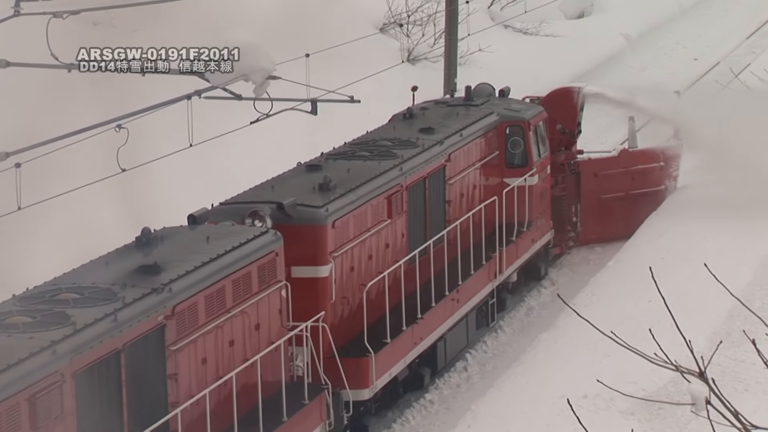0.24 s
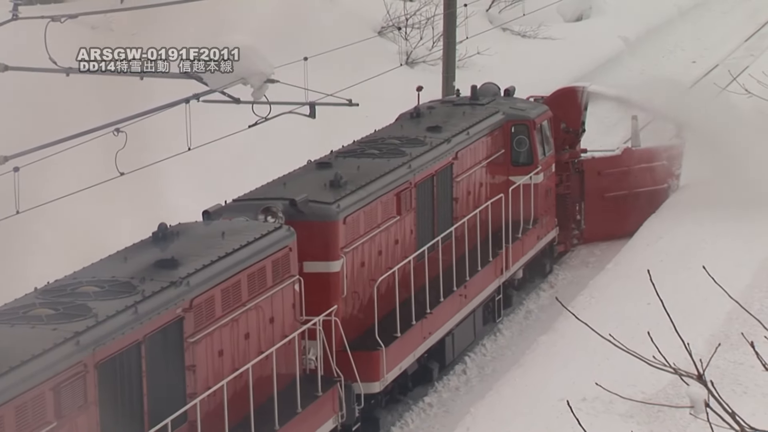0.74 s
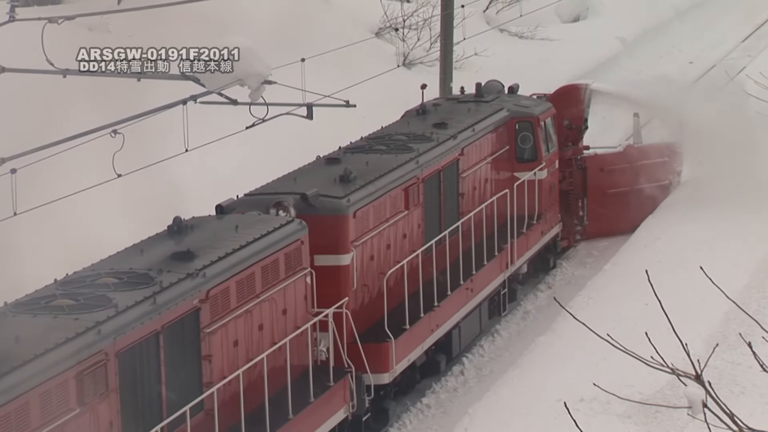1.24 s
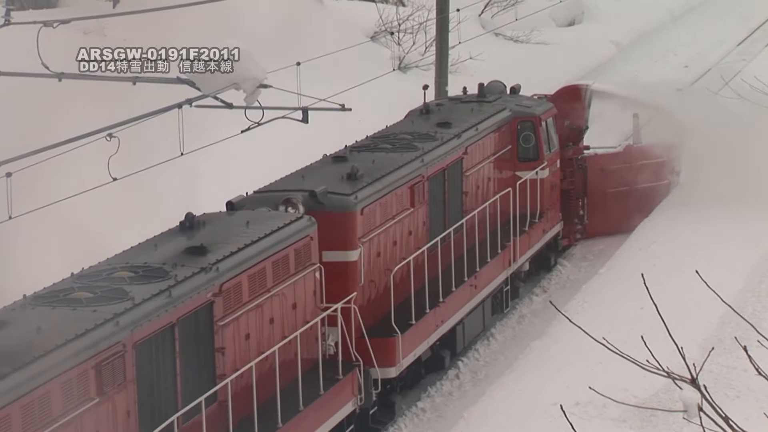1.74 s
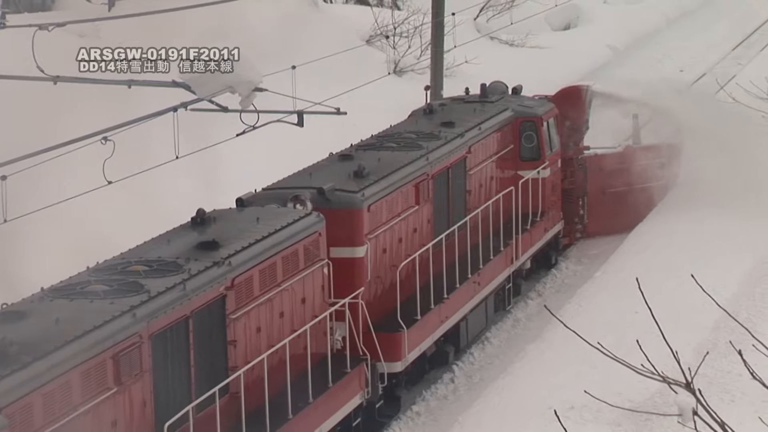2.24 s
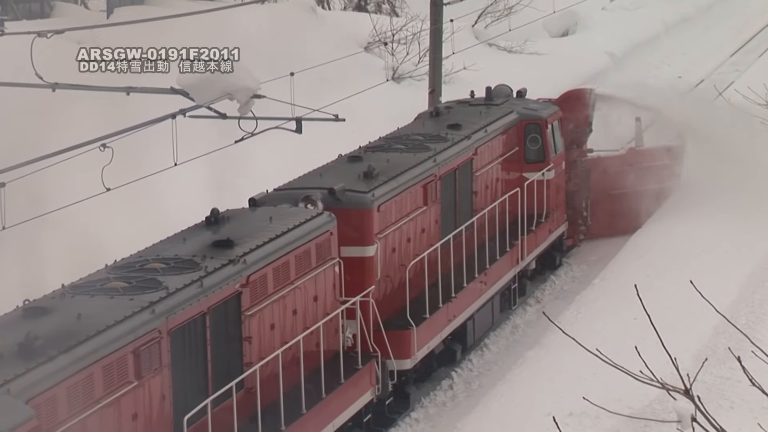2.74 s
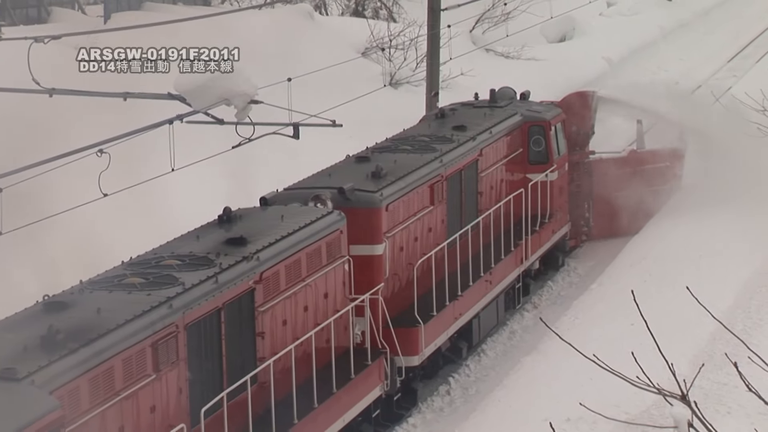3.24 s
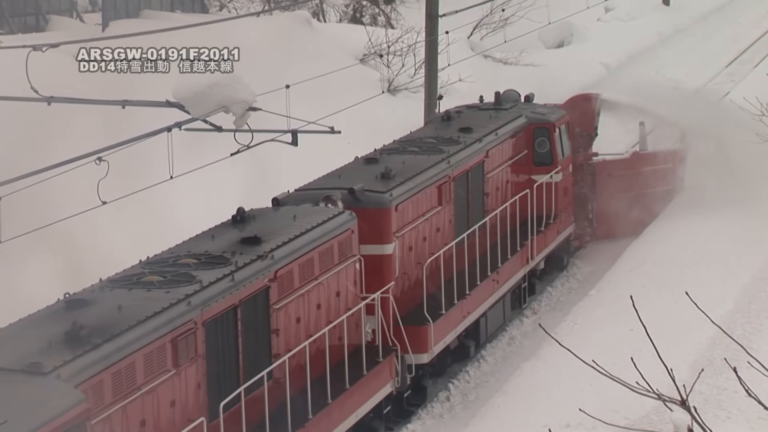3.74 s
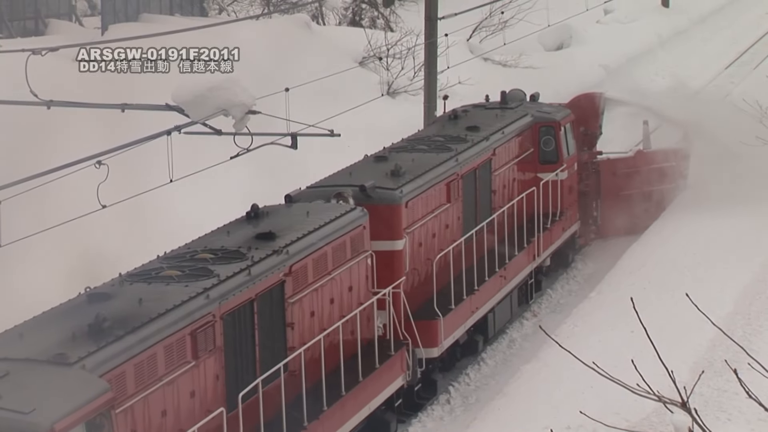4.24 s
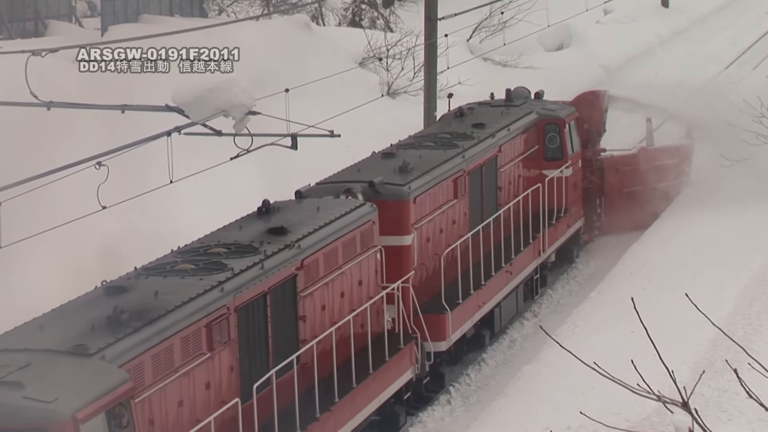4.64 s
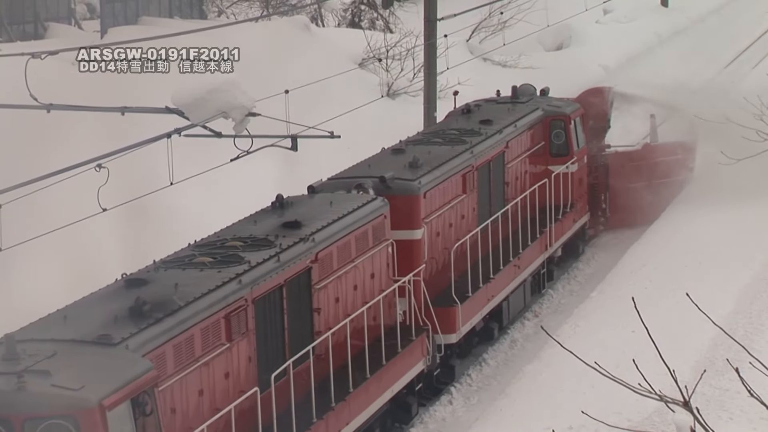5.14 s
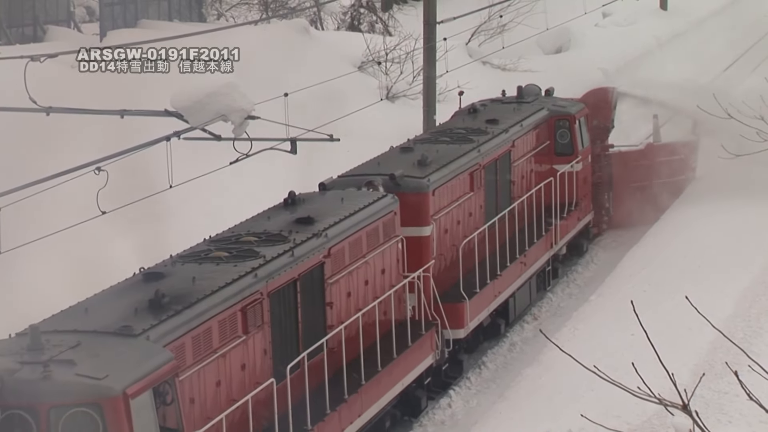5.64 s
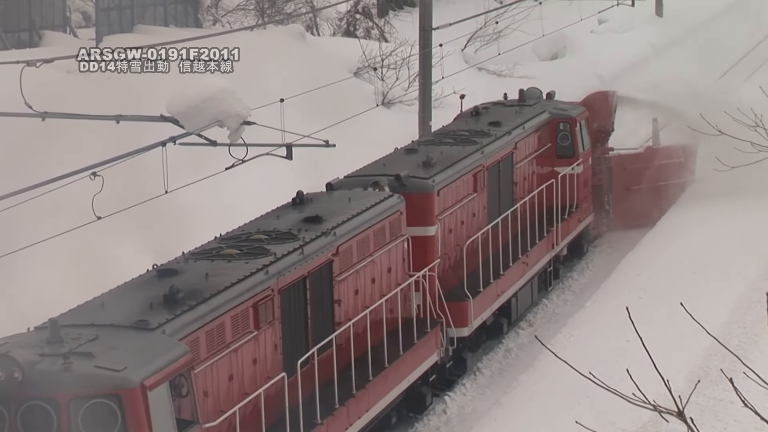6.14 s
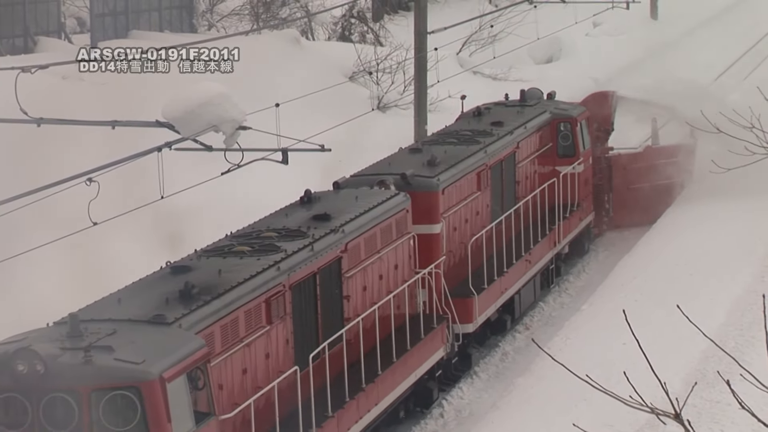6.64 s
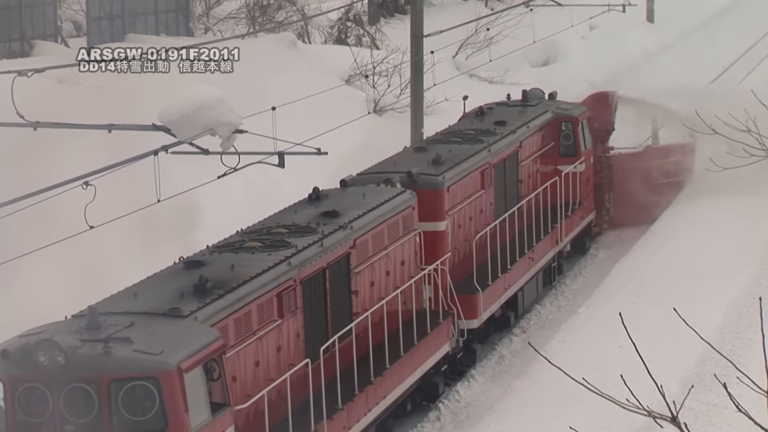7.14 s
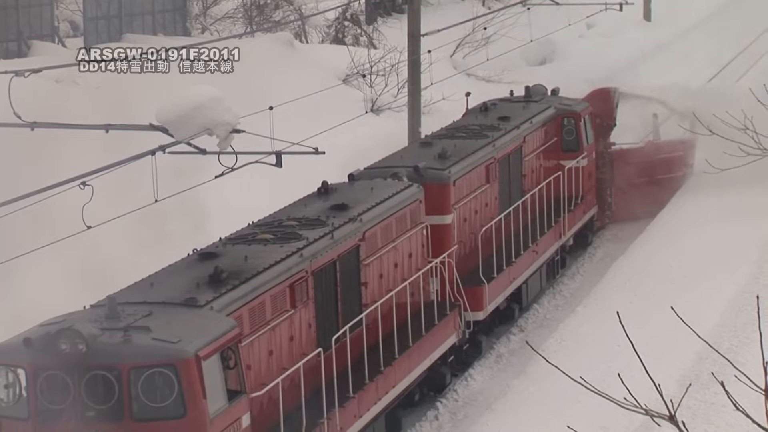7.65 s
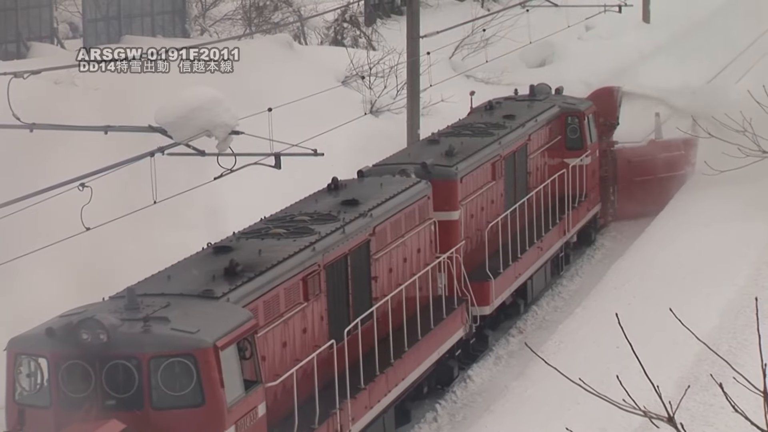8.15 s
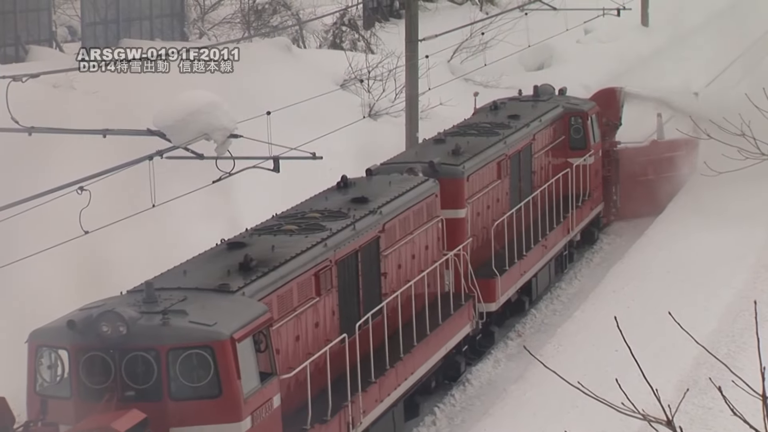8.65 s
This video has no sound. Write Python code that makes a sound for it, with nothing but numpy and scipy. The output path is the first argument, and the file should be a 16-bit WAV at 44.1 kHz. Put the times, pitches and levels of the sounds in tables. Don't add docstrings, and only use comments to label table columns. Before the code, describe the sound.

Diesel locomotives throb and a snow blower thumps and roars with whining gears on a snowy railway, while nearby camera shutters snap.

```python
import sys
import numpy as np
from scipy import signal
from scipy.fft import rfft, irfft
from scipy.io import wavfile
from scipy.ndimage import uniform_filter1d

SR = 44100
rng = np.random.default_rng(int(sys.argv[2]) if len(sys.argv) > 2 else 0)


def makeup_ratio(level_db):
    decades = np.asarray(level_db, float) / 20
    return 10 ** decades


def output_pcm(signal):
    pcm = np.clip(np.atleast_2d(signal).T, -1, 1) * 32767
    wavfile.write(sys.argv[1], SR, np.round(pcm).astype(np.int16))


N = 392049

# frequency_hz, left_right_likeness [0 to 1]
LIKENESS = [(30, .8), (110, .97), (200, .995), (380, 0.9), (700, 0.92), (1290, 0.86), (2380, 0.98),
            (4400, 0.97), (8120, 0.036), (15000, 0.25)]
# frequency_hz, left_right_db
BALANCE = [(60, 0), (200, 0), (330, -.8), (640, .3), (1410, -1.2), (3100, .1), (6820, 0)]
# time_s, engine_effort_db, snow_feed_db
WORK = [(0, -37.5, -33.5), (.3, -37, -32), (.89, -36.5, -35), (1.11, -36, -35), (1.36, -38.5, -37),
        (1.71, -40, -36.5), (2.13, -39.5, -34), (2.75, -37, -33.5), (3.17, -37.5, -35.5), (3.46, -38, -34),
        (3.84, -37.5, -35.5), (4.8, -40.5, -36.5), (5.2, -39.5, -37), (5.95, -41, -35.5), (6.9, -39.5, -37),
        (7.67, -42, -39), (8.39, -39.5, -37), (8.89, -39.5, -36.5)]
# centre_s, half_length_s, level_db
GUSTS = [
    (.95, 0.23, 1),
    (3.8, 0.27, 2),
    (6.15, 0.2, 0.5),
    (6.65, 0.27, 2),
    (8.6, .3, -1.5),
]
# frequency_hz, density_db [per Hz]
SNOW_HISS = [(4300, -20), (5000, 2), (5700, -0.5), (7100, -10.5), (8200, -7.5), (9600, -11.5), (11200, -7),
             (13000, -10.5), (14200, -8), (14400, -40), (15000, -70)]
# time_s, shaft_hz
FANS = [
    [(0, 30.1), (3.5, 30.12), (5.5, 30.38), (8.89, 30.36)],
    [(0, 33.03), (2, 33.1), (5, 33.28), (8.89, 33.28)],
]
# shaft_order, level_db
FAN_ORDERS = [(1, -46), (2, -50)]
# start_s, level_db, left_right_db, dull_knock_db [knock under the tick]
TICKS = [(1.36, -39, 9, -5), (1.6565, -36.5, -5, 0), (1.765, -37, 9, -10), (1.8025, -36, 11, -12),
         (1.882, -28, 12, -5), (2.4738, -34, 13, -12), (2.6555, -41, -10, -12), (3.1937, -25, 12, -10),
         (3.8574, -42, 6, -12), (4.1455, -34, -16, -12), (4.1567, -32, 12, -11), (4.292, -32.5, 15, -2),
         (4.301, -38, -7, 3), (4.566, -29, 10, 1), (4.9195, -38, -8, 0), (5.74, -34, 7, 1),
         (5.7465, -37, 7, -2), (5.8425, -40, 9, -3), (5.8523, -33, 13, -2), (6.091, -33, 10, -16),
         (6.824, -26, -13, -1), (6.9455, -43, 5, -4), (7.058, -42, 1, 2), (7.2245, -37, 3, -4),
         (7.4015, -40, 9, -14), (7.587, -38, -9, -8), (7.9247, -23, -8, -16), (8, -29.5, 6, -10),
         (8.8067, -30.5, 11, 7), (8.8825, -41, -6, -2)]
# frequency_hz, level_db
TICK_COLOUR = [(5000, -30), (7000, -24), (9000, -5.5), (11500, 1.5), (14000, 3.5), (15300, -2),
               (16500, -28)]
# frequency_hz, level_db
KNOCK_COLOUR = [(2000, -22), (3500, 1), (5000, 4), (6500, -11.5), (8500, -11)]
# start_s, level_db, mirror_up_s
RELEASES = [(0.0272, -33, .0649), (0.357, -35, .0643), (0.5535, -32, .0675), (2.0806, -32.5, .0673),
            (2.2781, -34.5, .0699), (2.7215, -34.5, .0645), (2.9182, -33.5, .0673), (5.239, -32, .064),
            (5.436, -33, .0668), (8.1705, -33, .0628), (8.3678, -32.5, .0635)]
# delay_s [after release], level_db, rise_s, t60_s
MIRROR_LIFT = [
    (0, 2, 0.0011, 0.031),
    (.003, -20, 0.00088, 0.009),
    (.009, -26, .001, .015),
    (.025, -5.5, 0.0011, 0.023),
]
# delay_s [after return], level_db, rise_s, t60_s
MIRROR_RETURN = [
    (-.025, -4, .003, .08),
    (-.018, -4, 0.0012, .025),
    (-.01, -20, .005, .06),
    (0, 0.5, 0.0013, 0.025),
    (.004, -7, 0.00086, 0.025),
    (.014, -14, .004, 0.07),
    (0.024, -9, 0.0012, 0.041),
    (.032, -12, .003, .02),
]
# start_s, level_db
SHOTS = [
    (1.5137, -33.5),
    (2.5124, -34),
    (3.551, -34.5),
    (4.757, -34),
]
# delay_s [after release], level_db, rise_s, t60_s
SHOT_CYCLE = [
    (0, -2.5, 0.0013, 0.032),
    (0.01, -14, .002, .02),
    (0.015, 2.5, 0.00056, 0.016),
    (.023, -6, .001, .012),
    (.05, -14, .003, .02),
    (0.055, 0, 0.0014, 0.031),
    (.071, -9, .001, .01),
    (.082, 5.5, 0.0019, .03),
    (.141, -8.5, .001, .012),
]
# frequency_hz, density_db [per Hz]
LEFT_BODY = [(1800, -18), (3000, 1.5), (4200, -6), (5100, -1.5), (5550, -1.5), (6100, -6), (7000, -12.5),
             (8200, -6.5), (9600, -10), (11400, -3.5), (12600, -8.5), (13900, -5), (15100, -15),
             (16000, -50)]
# frequency_hz, density_db [per Hz]
RIGHT_BODY = [(1800, -30), (3200, -8), (4800, 1), (6000, -7.5), (6800, -12), (8200, -6.5), (9700, -11),
              (10600, -2), (12000, -8), (13400, 2), (15000, -0.5), (16200, -40)]
# frequency_hz, width_hz, level_db
BANKS = [(1000, 26, 2), (1444, 25, -7), (1790, 68, -1.5), (4530, 200, -9.5), (5340, 71, -13)]
# frequency_hz, density_db [per Hz]
EXHAUST = [(15, -45), (24, -24), (36, -28), (50, -18), (70, -13), (100, -8), (135, -1.5), (200, -6),
           (260, -9.5), (320, -15), (450, -12.5), (600, -11), (900, -13.5), (1100, -33)]
# frequency_hz, density_db [per Hz]
DRONE = [(550, -4), (940, -12.5), (993, -9.5), (1100, 4), (1220, 1.5), (1270, 2.5), (1420, -17.5),
         (1460, -12.5), (1900, -49), (3210, -120)]
# frequency_hz, density_db [per Hz]
WHINE = [(840, -46), (1420, -5.5), (1590, 5), (1670, 4), (1780, 4), (1880, -17.5), (2440, 3), (4140, -120)]
# frequency_hz, density_db [per Hz]
MESH = [(1570, -25), (1610, -2), (1645, 2), (1690, -38)]
# frequency_hz, density_db [per Hz]
HOWL = [(1060, -26), (1800, -9), (1880, -6.5), (2420, 3), (3000, -9.5), (3400, -17.5), (4420, -49),
        (7480, -120)]
# frequency_hz, density_db [per Hz]
RUSH = [(1820, -29), (3100, -2), (3790, -4), (4410, -14.5), (4670, -4.5), (4920, -8.5), (5390, -19),
        (5810, -19.5), (6190, -29), (7200, -36.5), (9360, -61), (15800, -120)]
# centre_s, half_length_s, level_db
SURGES = [
    (0.286, 0.61, 6),
    (1.05, 0.17, 2),
    (1.9, 0.34, 1.5),
    (2.552, 0.97, 5),
    (3.605, 0.31, 3.5),
    (4.254, 0.37, 5.5),
    (5.29, 0.12, 4.5),
    (6.291, .8, 2),
    (7.67, 0.28, -1),
    (8.5, .4, 3),
]
# cycle_order, level_db
LEAD = [(3, -69), (4, -57), (6, -32.5), (7, -48), (8, -48), (9, -47), (10, -46.5), (11, -54.5), (12, -48),
        (14, -69), (15, -83), (18, -60.5), (20, -67.5), (24, -71), (26, -78), (28, -61.5), (32, -72.5),
        (36, -54), (38, -60), (41, -50)]
# cycle_order, level_db
REAR = [(3, -49.5), (5, -80), (6, -35.5), (7, -44), (8, -55), (9, -37), (10, -43.5), (11, -50.5), (12, -70),
        (14, -48.5), (15, -47), (17, -55.5), (18, -56.5), (28, -55.5), (32, -53), (33, -58.5), (36, -60),
        (37, -68), (42, -52), (48, -55), (60, -56)]
# frequency_hz, level_db, t60_s
CHUTE = [(139.4, -6.5, 0.31), (112.9, 2, 0.27), (203, 1.5, 0.042)]
# blade_order, level_db
BLADE_HUM = [(6, -43.5)]
# start_s, level_db
LUMPS = [(0.1, -16), (0.15, -12.5), (0.796, -14.5), (0.972, -16.5), (1.147, -10.5), (1.319, -17),
         (2.15, -16), (2.194, -16.5), (2.367, -17), (2.544, -10), (2.672, -13), (2.717, -17), (2.849, -17),
         (3.549, -17), (3.717, -12), (3.896, -12), (4.068, -12), (4.116, -14.5), (4.377, -14.5),
         (4.766, -11.5), (4.947, -15), (5.286, -19), (5.643, -17), (6.644, -12), (6.866, -13.5),
         (6.991, -10.5), (7.168, -13.5), (7.341, -16), (8.04, -14)]

LEAD_HZ, REAR_HZ = 12.9248, 13.0402
BLADE_HZ = 22.914
MEAN_EFFORT_DB, MEAN_FEED_DB = -38.5, -36
PORT_LAG = 4


def evened(x):
    return x / np.sqrt(np.mean(x ** 2) + 1e-20)


def read(points, hz):
    f, value = np.transpose(points)
    return np.interp(np.log(hz + 1), np.log(f + 1), value)


def curve(rows, column):
    rows = np.array(rows)
    return np.interp(np.arange(N) / SR, rows[:, 0], rows[:, column])


def humps(rows):
    t = np.arange(N) / SR
    return sum(db * np.exp(-((t - s) / half) ** 2) for s, half, db in rows)


def drift(hz):
    t = np.arange(0, N + 64, 64) / SR
    slow = sum(np.sin(2 * np.pi * (f * t + rng.random())) / np.sqrt(f)
               for f in np.geomspace(hz / 20, hz, 16))
    return np.interp(np.arange(N) / SR, t, evened(slow))


def colour(x, points):
    hz = np.fft.rfftfreq(x.shape[-1], 1 / SR)
    inside = (hz >= points[0][0]) & (hz <= points[-1][0])
    return irfft(rfft(x) * makeup_ratio(read(points, hz)) * inside, x.shape[-1])


def noise(points, patchy_db, size=1024):
    hz = np.fft.rfftfreq(size, 1 / SR)
    frames = 4 * N // size + 5
    a, b, c, d, patches = rng.standard_normal((frames, len(hz), 5)).T
    patches = uniform_filter1d(patches, size=6, axis=0)
    patches = evened(uniform_filter1d(patches, size=12, axis=1))
    same = np.clip(read(LIKENESS, hz), -1, 1)[:, None]
    left = a + 1j * b
    right = same * left + np.sqrt(1 - same ** 2) * (c + 1j * d)
    inside = (hz >= points[0][0]) & (hz <= points[-1][0])
    balance_db = np.array([[.5], [-.5]]) * read(BALANCE, hz)
    level_db = (read(points, hz) + balance_db)[:, :, None] + patchy_db * patches
    z = np.array([left, right]) * makeup_ratio(level_db) * inside[:, None]
    return evened(signal.istft(z, nperseg=size, noverlap=size * 3 // 4)[1][:, :N])


def orders(turns, table, phases, waver_db):
    return sum(np.sqrt(2) * makeup_ratio(db + waver_db * drift(1.374))
               * np.cos(2 * np.pi * (k * turns + phases[int(k)])) for k, db in table)


def bursts(rows):
    env = np.zeros(N + SR)
    u = np.arange(SR // 10) / SR
    for s, db, rise, t60 in rows:
        decay = makeup_ratio(db - 60 * np.maximum(u - rise, 0) / t60)
        env[round(s * SR):][:len(u)] += decay * np.minimum(u / rise, 1)
    return env[:N]


def nearby(env, body, pan_db, same, rattle_db, lag=PORT_LAG):
    rattle = evened(uniform_filter1d(rng.standard_normal(N), size=24))
    a, b = rng.standard_normal((2, N)) * makeup_ratio(rattle_db * rattle)
    scale = np.std(colour(a, body))
    near, other = colour(a * env, body) / scale, colour(b * env, body) / scale
    far = np.roll(same * near + np.sqrt(1 - same ** 2) * other, lag) * makeup_ratio(-pan_db)
    return np.array([near, far])


def breeze():
    feed_db = 1.06 * (curve(WORK, 2) - MEAN_FEED_DB)
    level_db = -66.5 + humps(GUSTS) + feed_db + 4.5 + 0.2 * drift(8)
    return nearby(makeup_ratio(level_db), SNOW_HISS, pan_db=0.5, same=0.51, rattle_db=2.5)[::-1]


def fans():
    first, second = (np.cumsum(curve(rows, 1)) / SR for rows in FANS)
    slower = orders(first, FAN_ORDERS, np.zeros(3), waver_db=.5)
    return slower + orders(second - .15, FAN_ORDERS, np.zeros(3), waver_db=.5)


def grains():
    per_s, level_db = 3, -49
    s, size, side, dull = rng.random((int(per_s * N / SR), 4)).T
    return list(zip(s * N / SR * .99, level_db + 8 * (size - .5), 20 * side - 8, 16 * dull - 12))


def ticks():
    out, every = np.zeros((2, N)), TICKS + grains()
    for side in (1, -1):
        rows = [row for row in every if (row[2] >= 0) == (side == 1)]
        a, b = rng.standard_normal((2, N))
        far_source = np.roll(a, PORT_LAG) * 0.52 + 1.3 * b
        for port, source in ((0, a), (1, far_source)):
            for body, dull in ((TICK_COLOUR, 0), (KNOCK_COLOUR, 1)):
                snaps = []
                for s, db, pan, knock_db in rows:
                    far_loss_db = port * abs(pan) * (1 - .4 * dull)
                    level_db = db - 5.0 - far_loss_db + dull * knock_db
                    snaps.append((s + port * PORT_LAG / SR, level_db, .0004, 0.0082 + 0.0035 * dull))
                out[::side][port] += colour(source * bursts(snaps), body) / np.std(colour(a, body))
    return out


def actions(events, parts):
    return [(s + delay, db + part_db, rise, t60) for s, db in events for delay, part_db, rise, t60 in parts]


def cameras():
    lifts = [(s, db) for s, db, up in RELEASES]
    returns = [(s + up, -29.5) for s, db, up in RELEASES]
    left = bursts(actions(lifts, MIRROR_LIFT) + actions(returns, MIRROR_RETURN))
    right = bursts(actions(SHOTS, SHOT_CYCLE))
    left_sound = nearby(left, LEFT_BODY, pan_db=5.0, same=0.73, rattle_db=2.5, lag=3)
    right_sound = nearby(right, RIGHT_BODY, pan_db=8.0, same=0.52, rattle_db=0.5)[::-1]
    return makeup_ratio(-1.5) * left_sound + makeup_ratio(-0.5) * right_sound


def banks(x):
    hz = np.fft.rfftfreq(N, 1 / SR)
    echo_db = sum(db * np.exp(-((hz - f) / width) ** 2) for f, width, db in BANKS)
    return irfft(rfft(x) * makeup_ratio(echo_db), N)


def gears():
    t, whine_db = np.arange(N) / SR, -46.5
    level_db = whine_db + humps(SURGES)
    knock_db = np.clip(.6 * (level_db + 48), 1, 5.5)
    knock = np.cos(2 * np.pi * REAR_HZ * (t - 3.51)) + 0.16
    mesh = noise(MESH, patchy_db=3.2, size=4096) * makeup_ratio(-10.5 + level_db - whine_db)
    return (noise(WHINE, patchy_db=0.0) + mesh) * makeup_ratio(level_db + knock_db * knock)


def roar():
    t = np.arange(N) / SR
    firing_db = 0.72 * np.cos(4 * np.pi * REAR_HZ * t) + 0.35 * np.cos(12 * np.pi * LEAD_HZ * t)
    effort_db, feed_db = curve(WORK, 1) - MEAN_EFFORT_DB, curve(WORK, 2) - MEAN_FEED_DB
    exhaust = noise(EXHAUST, patchy_db=-0.5, size=4096) * makeup_ratio(-40.5 + 0.98 * effort_db + 5.0)
    drone_db = -38 + 1.05 * effort_db + firing_db + 1.3 * drift(6)
    drone = noise(DRONE, patchy_db=-0.27) * makeup_ratio(drone_db)
    howl = noise(HOWL, patchy_db=1.14) * makeup_ratio(-36.5 + feed_db + 0.11 * drift(30))
    rush = noise(RUSH, patchy_db=1.04) * makeup_ratio(-49 + 1.22 * feed_db + 0.58 * drift(30))
    return exhaust + drone + gears() + howl + rush


def engines():
    t, pipe_phases = np.arange(N) / SR, rng.random(64)
    lead_turns = LEAD_HZ * t + 0.00093 * drift(0.14)
    rear_turns = REAR_HZ * t + .428 + 0.00072 * drift(0.71)
    lead = orders(lead_turns, LEAD, pipe_phases, waver_db=-0.2)
    return lead + orders(rear_turns, REAR, pipe_phases, waver_db=0.0)


def bites():
    heavy_hz, heavy_s = 5.811, 1.146
    s = np.arange(.101, N / SR - .05, 1 / BLADE_HZ)
    light = .5 - .5 * np.cos(2 * np.pi * heavy_hz * (s - heavy_s))
    db = -19.5 - 25 * light + 3 * rng.standard_normal(len(s))
    free = abs(s[:, None] - np.array(LUMPS)[:, 0]).min(axis=1) > .5 / BLADE_HZ
    return LUMPS + list(zip(s[free], db[free]))


def chute():
    passes = np.arange(-4, int(N / SR * BLADE_HZ))
    at = ((.034 + (passes + 4) / BLADE_HZ) * SR).astype(int)
    blade_db = np.array([1.0, 0.5, -6.5, -1.0])[passes % 4]
    strikes = np.zeros(N + SR)
    strikes[at] = makeup_ratio(blade_db + 0.55 * rng.standard_normal(len(at)))
    t = np.arange(SR // 3) / SR
    ring = sum(makeup_ratio(db - 60 * t / t60) * np.sin(2 * np.pi * hz * t) for hz, db, t60 in CHUTE)
    ring = ring * np.cos(np.pi / 2 * t / t[-1])
    return makeup_ratio(-36.0) * evened(signal.oaconvolve(strikes, ring)[:N])


def rotor():
    out = chute()
    u = np.arange(-700, 1400) / SR
    swell = np.where(u < 0, np.exp(-(u / 0.0024) ** 2), np.exp(-u / 0.0089) * (1 - u / u[-1]))
    thuds = bites()
    for (s, db), (pitch, turn) in zip(thuds, rng.random((len(thuds), 2))):
        cycles = (125 + 35 * pitch) * u + 0.48 + 0.35 * turn
        body = np.cos(2 * np.pi * cycles)
        body += 0.23 * np.cos(2 * np.pi * 1.807 * cycles)
        thud = makeup_ratio(db - 1.5) * swell * body
        part = out[round(s * SR) - 700:][:len(u)]
        part += thud[:len(part)]
    hum = orders(BLADE_HZ * np.arange(N) / SR, BLADE_HUM, np.zeros(7), waver_db=2.5)
    return hum + signal.sosfilt(signal.butter(2, 2000, fs=SR, output="sos"), out)


def scene():
    away_db = -0.33 * (np.arange(N) / SR - 4.4)
    surroundings = breeze() + fans() + ticks() + cameras()
    return surroundings + banks(roar()) + (engines() + rotor()) * makeup_ratio(away_db)


def low_pass(x):
    return signal.sosfilt(signal.butter(12, 16520, fs=SR, output="sos"), x)


def record(dry):
    heard = signal.sosfilt(signal.butter(3, 22, "high", fs=SR, output="sos"), dry)
    return low_pass(heard)


dry = scene()
out = record(dry)
output_pcm(out)
```